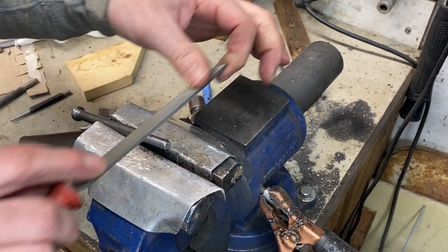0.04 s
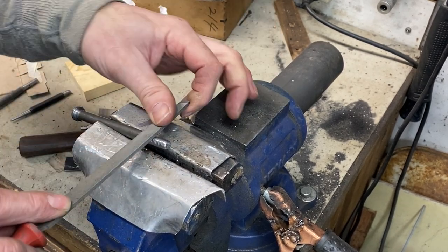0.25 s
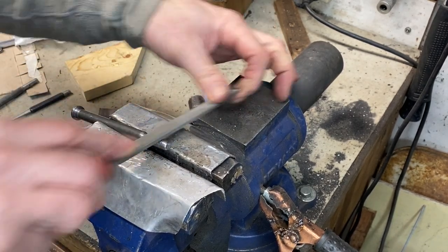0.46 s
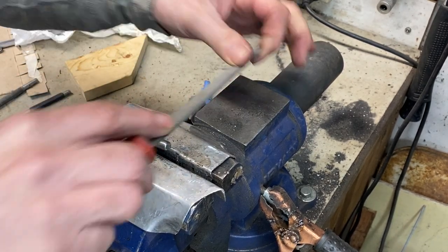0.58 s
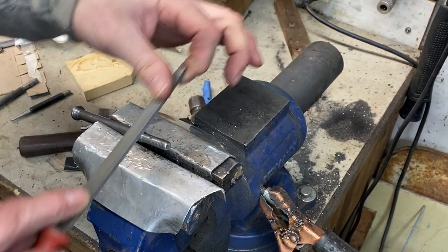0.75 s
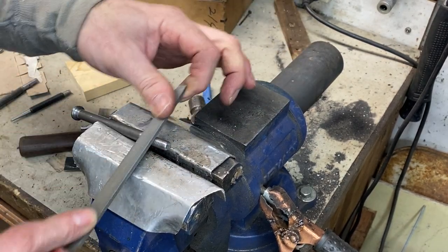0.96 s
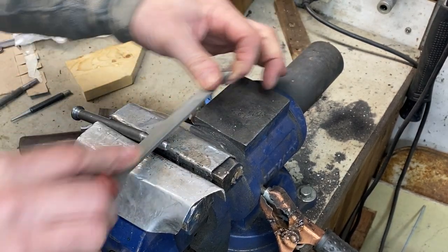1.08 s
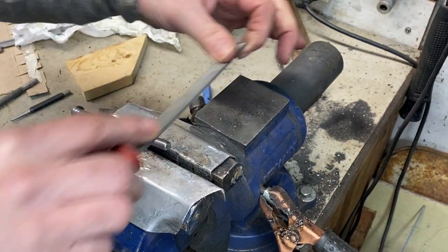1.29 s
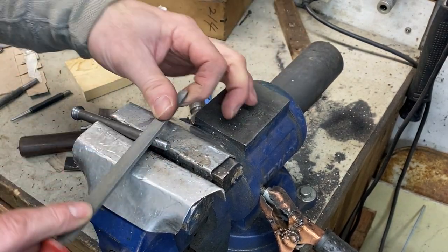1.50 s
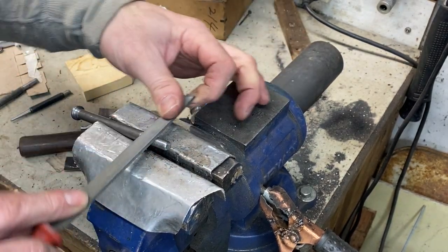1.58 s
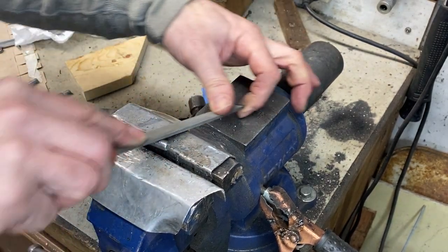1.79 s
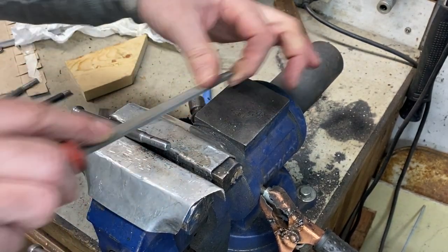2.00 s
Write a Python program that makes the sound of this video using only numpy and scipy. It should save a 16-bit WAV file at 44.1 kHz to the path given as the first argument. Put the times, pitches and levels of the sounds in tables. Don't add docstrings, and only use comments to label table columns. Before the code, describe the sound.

A hand file rasps over a steel pin clamped in a bench vice, three short strokes. Each begins with a metallic clack, then a gritty scrape rising in pitch; close stereo microphone in a small workshop.

```python
import sys
import numpy as np
from scipy import signal
from scipy.fft import rfft, irfft, next_fast_len
from scipy.io import wavfile

SR = 44100
rng = np.random.default_rng(int(sys.argv[2]) if len(sys.argv) > 2 else 0)


def magnitude_from_level(level_db):
    exponent = np.asarray(level_db, float) / 20
    return 10 ** exponent


def generate_wav(sig):
    pcm = np.round(np.clip(np.atleast_2d(sig).T, -1, 1) * 32767).astype(np.int16)
    wavfile.write(sys.argv[1], SR, pcm)


N = 90404
SIZE = next_fast_len(N + SR)
TIME_S = np.arange(N) / SR

# f/Hz, width/Hz, level/dB
BODY = [(660.2, 17, 3.5), (843.6, 29, 4.5), (923, 41, -8), (1064.6, 53, 2.5), (1351, 16, 1.5),
        (1474, 110, 5), (1820, 65, 2.5), (2100, 150, 7), (2258, 25, 2), (2568, 34, 3), (3473, 120, 0.5),
        (4221, 38, 12.5), (5150, 230, 7.5), (5646, 26, 14.5)]


def rms_one(x):
    return x / np.sqrt(np.mean(x ** 2) + 1e-20)


def at_hz(points):
    hz, value = np.transpose(points)
    grid_hz = np.arange(SIZE // 2 + 1) * SR / SIZE
    return np.interp(np.log(grid_hz + 1), np.log(hz), value)


def colour(x, points):
    ceps = irfft(np.log(magnitude_from_level(at_hz(points))), SIZE)
    ceps[1:SIZE // 2] *= 2
    ceps[SIZE // 2 + 1:] = 0
    response = np.exp(rfft(ceps))
    return irfft(rfft(x, SIZE) * response, SIZE)[..., :N]


def drift(rate_hz):
    r = np.exp(-2 * np.pi * rate_hz / SR)
    wander = signal.lfilter([1], [1, -2 * r, r * r], rng.standard_normal(N + SR))
    return rms_one(wander[SR:])


def resonance(x, hz, width_hz):
    r = np.exp(-np.pi * width_hz / SR)
    poles = [1, -2 * r * np.cos(2 * np.pi * hz / SR), r * r]
    return signal.lfilter([(1 - r * r) / 2, 0, (r * r - 1) / 2], poles, x + 1e-18)


def noise_tone(hz, width_hz):
    return rms_one(resonance(rng.standard_normal(N), hz, width_hz))


def swells(rows, size_of):
    return sum(size_of(db) * np.exp(-.5 * ((TIME_S - s) / length) ** 2) for s, db, length in rows)


def steel(x, ring_db, direct_db=0):
    out = magnitude_from_level(direct_db) * x
    for k, (hz, width_hz, db) in enumerate(BODY):
        sign = (-1) ** k
        out = out + sign * magnitude_from_level(db + ring_db[k]) * resonance(x, hz, width_hz)
    return out


def rumble(press_db):
    # f/Hz, level/dB per Hz
    floor = [(27, -39), (52, -1.5), (80, -9.5), (140, -24), (280, -38), (800, -39.5), (1500, -53),
             (9000, -68)]
    level_db, side_db, flicker_db = -58, -16.5, 1
    whine_db, sway_db, sway_t60_s = -27, -7.5, 0.99
    mid, side = colour(rng.standard_normal((2, N)), floor)
    mid = mid + magnitude_from_level(whine_db) * np.std(mid) * noise_tone(950, 29)
    r = magnitude_from_level(-60 / sway_t60_s / SR)
    pushing = 1. * (press_db > -60)
    sway = rms_one(signal.lfilter([1], [1, -r], pushing))
    scale = magnitude_from_level(level_db + flicker_db * drift(4.3)) * (1 + magnitude_from_level(sway_db) * sway) / np.std(mid)
    return scale * (mid * magnitude_from_level([[-.4], [.4]]) + magnitude_from_level(side_db) * side * [[1], [-1]])


def taps():
    # t/s, peak level/dB, hardness/dB, loudest pitch f/Hz, its level/dB
    touches = [(0.2149, -19, -2.5, 1075, -4.5), (0.2212, -25, -8, 1394, 7.5), (0.8465, -16, 5.5, 1890, -9),
               (0.8469, -27, -5, 1045, 7.5), (.9237, -29, -10.5, 2020, 4), (1.4668, -10, 6, 1041, -7.5),
               (1.549, -26, -5.5, 1870, 1.5), (1.587, -35.5, -5, 2016, 0), (1.605, -28.5, -9, 2100, 3.5),
               (1.623, -44, -2, 5260, -9.5), (1.668, -24, -5.5, 1790, 8.5), (1.794, -35, -5.5, 1110, 6),
               (2.013, -55, -1, 3100, -5.5), (1.77, -31.5, -3, 3450, 4), (1.796, -36, 2.5, 3430, 4)]
    # ring of the free file level/dB, rattle level/dB
    tails = [(-8, -9.5), (-12, -11.5), (-21, -12), (-8.5, -10.5), (-14, -7.5), (-20, -16.5), (-13, -6.5),
             (-29.5, -9), (-18, -9.5), (-13.5, -18), (2, -5), (-3, -8.5), (-20, -15), (-1, -9), (-3, -10)]
    # f/Hz, level/dB per Hz
    crack_colour = [(200, -20), (500, -15), (1100, -1.5), (2300, -11), (4000, -2), (6000, -3),
                    (10000, -4.5), (15500, -36)]
    # f/Hz, level/dB per Hz
    rattle_colour = [(150, -10), (400, 4), (1000, -8), (2300, -9.5), (5000, -13.5), (9000, -15),
                     (15000, -19)]
    # f/Hz, width/Hz, level/dB
    file_tones = [(2330, 45, -7), (3430, 22, -8), (4280, 45, -14), (5190, 60, -11), (5780, 60, -20)]
    gain_db, ring_db, peak_width_hz = -0.5, -1.5, 160
    burst_s, click, rattle_s, rattle_rise_s = .0012, 5, 0.014, 0.0036
    thud_hz, thud_db, thud_t60_s, thud_rise_s = 103.3, -26, 0.43, .015
    out = np.zeros(N)
    for (s, db, hard_db, peak_hz, peak_db), (file_db, rattle_db) in zip(touches, tails):
        age = np.maximum(TIME_S - s, 0)
        crack, rattle = rng.standard_normal((2, N)) * (TIME_S >= s)
        crack[int(s * SR) + 1] = click
        tilted = [(hz, v + hard_db * np.log2(hz / 2000) / 2) for hz, v in crack_colour]
        crack = colour(crack * np.exp(-age / burst_s), tilted)
        rattle = rattle * np.exp(-age / rattle_s) * np.minimum(age / rattle_rise_s, 1)
        rattle = colour(rattle, rattle_colour)
        burst = crack / np.abs(crack).max() + magnitude_from_level(rattle_db) * rattle / np.abs(rattle).max()
        thud = magnitude_from_level(thud_db - 60 * age / thud_t60_s) * np.sin(2 * np.pi * thud_hz * age)
        thud = thud * np.minimum(age / thud_rise_s, 1)
        ring = steel(burst, ring_db + rng.normal(0, 1, len(BODY)))
        peak = resonance(burst, peak_hz, peak_width_hz)
        ring = ring + magnitude_from_level(peak_db) * peak / np.abs(peak).max()
        for hz, width_hz, tone_db in file_tones:
            free = resonance(burst, hz, width_hz)
            ring = ring + magnitude_from_level(file_db + tone_db) * free / np.abs(free).max()
        out += magnitude_from_level(db + gain_db) * (ring + thud)
    return out


def vice(x):
    # f/Hz, width/Hz, level/dB
    rings = [(804, 22, -4.5), (950, 5.9, -4.5), (1050, 11, -9), (1295, 8.1, -17.5), (2074, 14, -2.5),
             (2357, 24, -9), (3393, 26, 1.5), (4297, 32, -3.5)]
    return sum(magnitude_from_level(db) * resonance(x, hz, width_hz) for hz, width_hz, db in rings)


def ports(x, share=1):
    # f/Hz, phase/radians
    lead = [(400, 0), (700, 1.4), (900, 1.1), (1350, .1), (4050, -.1), (5860, -1.0), (6900, .2),
            (7300, 1.7)]
    # f/Hz, phase/radians
    lead_top = [(7300, 0), (8450, 1.36), (9650, 1.52), (11500, 4.3), (12800, 4.7), (13900, 7.72),
                (14300, 8.3), (16000, 8.4)]
    # f/Hz, left minus right level/dB
    pan = [(100, -.8), (350, 2), (700, -1), (1400, -1.8), (2800, -2.8), (5600, -.8), (9000, 0)]
    side = np.array([[.5], [-.5]])
    phase = side * share * (at_hz(lead) + at_hz(lead_top))
    turn = np.exp(1j * phase) * magnitude_from_level(side * at_hz(pan))
    return irfft(rfft(x, SIZE) * turn, SIZE)[:, :N]


def room(x):
    # f/Hz, t60/s
    fade = [(200, 0.38), (900, 0.43), (2000, 0.29), (4000, 0.33), (12000, 0.26)]
    level_db, side_db, side_top_hz, rise_s = -23.5, -5, 6260, .008
    age = np.arange(SR) / SR
    edges = 125 * 2 ** np.arange(0, 7.1, .5)
    hz, t60 = np.transpose(fade)
    white = rng.standard_normal((2, SR))
    tail = 0
    for low, high in zip(edges, edges[1:]):
        band = signal.sosfilt(signal.butter(2, [low, high], "band", fs=SR, output="sos"), white)
        tail = tail + band * magnitude_from_level(-60 * age / np.interp(np.log(low * high) / 2, np.log(hz), t60))
    tail = tail * np.minimum(age / rise_s, 1)
    tail = tail / np.sqrt(np.sum(tail ** 2) / 2)
    alike, unlike = irfft(rfft(tail, SIZE) * rfft(x, SIZE), SIZE)[:, :N]
    unlike = signal.sosfilt(signal.butter(4, side_top_hz, fs=SR, output="sos"), unlike)
    return magnitude_from_level(level_db) * (ports(alike) + magnitude_from_level(side_db) * unlike * [[1.5], [-.5]])


def hand():
    # t/s, tooth rate f/Hz, pressure level/dB, tooth tone level/dB, second overtone level/dB
    first = [
        (.25, 330, -51.5, -22.5, -3.5),
        (.335, 510.5, -33.5, -9, -5.5),
        (.378, 680, -28.5, -6.5, -1.5),
        (.4, 830, -26.5, -9.5, -7.5),
        (.428, 932.6, -25, -7, -6),
        (.447, 1052, -25.5, -11.5, 2.5),
        (.468, 1172, -30, -4.5, -6),
        (.492, 1050, -37, -17.5, 4.5),
        (.505, 950, -64, -19, 2),
    ]
    second = [
        (.918, 321, -47, -16.5, 2.5),
        (.972, 469.6, -28.5, -16, -16),
        (1.014, 660.4, -23.5, -14.5, 5),
        (1.036, 705.2, -26, -6, -9.5),
        (1.05, 859.6, -27, -6.5, 2),
        (1.085, 932.3, -28.5, -9, 3),
        (1.103, 1037, -25.5, -16.5, 3.5),
        (1.129, 1027, -28, -11.5, -1),
        (1.15, 1031, -57, 1.5, -0.5),
    ]
    third = [
        (1.549, 330, -44.5, -11.5, 6.5),
        (1.599, 423.8, -51.5, -6.5, -5.5),
        (1.653, 521.8, -32.5, -8, -9.5),
        (1.675, 598, -29, -8.5, -6.5),
        (1.686, 713, -26, -4.5, -18.5),
        (1.713, 715.7, -28, -4.5, -14.5),
        (1.747, 738, -27.5, -11.5, -9.5),
        (1.798, 769, -41.5, -10.5, -13.5),
        (1.826, 710, -70.5, -25.5, -13),
    ]
    rows = []
    for stroke in (first, second, third):
        start, end = stroke[0], stroke[-1]
        rows += [(start[0] - .004, start[1], -110, -6, 0), *stroke, (end[0] + .004, end[1], -110, -6, 0)]
    s, *columns = np.transpose(rows)
    return [np.interp(TIME_S, s, column) for column in columns]


def scrape(rate_hz, press_db, clear_db, second_db):
    # multiple of the tooth rate, level/dB
    orders = [(1, 9), (2, 8), (3, 0)]
    # t/s, level/dB
    third = [(.3, -5.5), (.37, -5), (.42, -11), (0.501, -2.5), (.95, -11), (0.999, -8), (1.101, 0.5),
             (1.6, -16), (1.72, -0.5)]
    # t/s, change of level/dB, length/s
    bites = [(.341, 3, .005), (.367, 4, .004), (.385, 4, .004), (.393, -4, .003), (.402, 3, .004),
             (.428, 4, .004), (.446, 5, .004), (.4525, -6, .0025), (.477, 3, .004), (.985, 3, .008),
             (1.03, 4, .005), (1.041, -4, .003), (1.053, 4, .006), (1.073, -7, .004), (1.083, 3, .004),
             (1.092, -4, .004), (1.105, 3, .005), (1.128, -6, .003), (1.134, 3, .003), (1.635, 3, .006),
             (1.672, 4, .004), (1.683, -3, .003), (1.695, 3, .004), (1.708, 4, .004), (1.718, -5, .004),
             (1.731, 4, .003), (1.755, 3, .006)]
    # f/Hz, level/dB per Hz
    grit_colour = [(150, -20), (500, 0.5), (1500, 2), (2300, 8), (2900, -3.5), (6000, -7.5), (9000, 0),
                   (15000, -20.5)]
    wobble, wobble_hz, tooth_flicker_db, flicker_hz = .032, 200, 2, 70
    tooth_low_hz, tooth_direct_db, tooth_ring_db = 570, -4.5, 4.5
    grit_per_s, grit_spread_db, grit_db, grit_flicker_db, bite_share = 16000, 2.5, -0.5, 1, .55
    bite_db = swells(bites, float)
    third_db = np.interp(TIME_S, *np.transpose(third))
    phase = 2 * np.pi * np.cumsum(rate_hz * (1 + wobble * drift(wobble_hz))) / SR
    teeth = 0
    for k, ((_, db), moving_db) in enumerate(zip(orders, (0, second_db, third_db))):
        tone_db = db + moving_db + tooth_flicker_db * drift(flicker_hz)
        teeth = teeth + magnitude_from_level(tone_db) * np.sin((k + 1) * phase)
    teeth = teeth * magnitude_from_level(press_db + clear_db + bite_db)
    teeth = signal.sosfilt(signal.butter(4, tooth_low_hz, "high", fs=SR, output="sos"), teeth)
    sizes = magnitude_from_level(grit_spread_db * np.minimum(rng.exponential(1, N), 5)) * rng.choice([-1, 1], N)
    clicks = sizes * (rng.random(N) < grit_per_s / SR)
    flicker = grit_flicker_db * drift(flicker_hz)
    grit = rms_one(colour(clicks, grit_colour)) * magnitude_from_level(press_db + bite_share * bite_db + grit_db + flicker)
    flat = np.zeros(len(BODY))
    return steel(grit, flat) + steel(teeth, flat + tooth_ring_db, tooth_direct_db)


def bench(press_db):
    level_db, follows, groan_db, tail_s = -44.5, 0.15, -11.5, 0.026
    groan_hz, groan_width_hz = 330, 400
    push = magnitude_from_level(follows * (press_db + 31.5)) * (press_db > -100)
    r = np.exp(-1 / tail_s / SR)
    hum = noise_tone(120.7, 14)
    groan = resonance(rng.standard_normal(N), groan_hz, groan_width_hz)
    groan = rms_one(resonance(groan, groan_hz, groan_width_hz))
    return magnitude_from_level(level_db) * (hum + magnitude_from_level(groan_db) * groan) * signal.lfilter([1 - r], [1, -r], push)


def lurch():
    # t/s, level/dB, length/s
    heaves = [
        (.26, -49.5, 0.031),
        (.4, -53.5, .05),
        (.92, -47, 0.048),
        (1.29, -66, 0.022),
        (1.53, -48.5, 0.051),
        (1.61, -42, 0.042),
    ]
    # f/Hz, level/dB per Hz
    heave_colour = [(25, -30.5), (40, -9), (60, 2), (110, -1.5), (200, -13), (400, -9), (600, -38.5)]
    return swells(heaves, magnitude_from_level) * rms_one(colour(rng.standard_normal(N), heave_colour))


def scene():
    # f/Hz, level/dB
    sheen = [(12000, 0.5), (13800, 4.5), (14700, 25.5), (15050, 22.5), (15300, -27.5), (16400, -38)]
    # f/Hz, level/dB
    wide = [(250, -11), (600, -8.5), (1200, -11.5), (2500, -11.5), (5000, -17), (9000, -14), (14000, -8),
            (15300, -38.5)]
    controls = hand()
    press_db = controls[1]
    background = rumble(press_db)
    touch = taps()
    push = scrape(*controls)
    far = colour(scrape(*controls), wide)
    low = bench(press_db) + lurch()
    near = ports(colour(push, sheen) + vice(push + touch) + low) + ports(touch, .88)
    return near + far * [[1], [-1]] + room(push + touch) + background


def roll_off(x):
    return signal.sosfilt(signal.butter(12, 16490, fs=SR, output="sos"), x)


def record(dry):
    hiss_db, top_hz = -91, 15800
    hissy = dry + magnitude_from_level(hiss_db) * rng.standard_normal(dry.shape)
    cut = signal.sosfilt(signal.cheby1(8, 1, top_hz, fs=SR, output="sos"), hissy)
    return roll_off(cut)


dry = scene()
out = record(dry)
generate_wav(out)
```